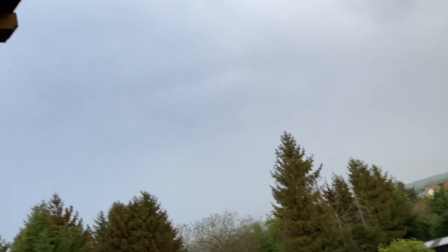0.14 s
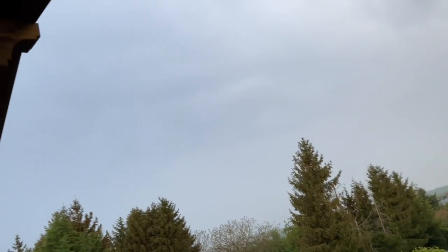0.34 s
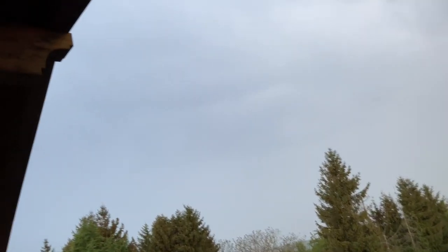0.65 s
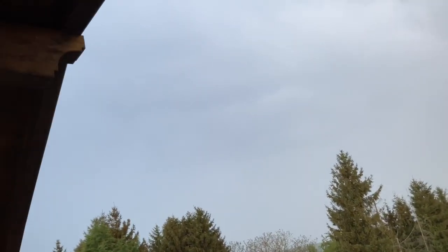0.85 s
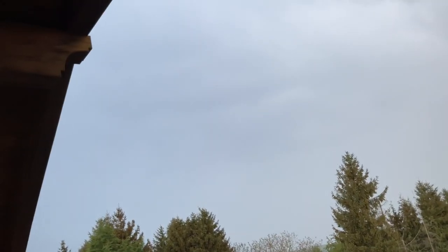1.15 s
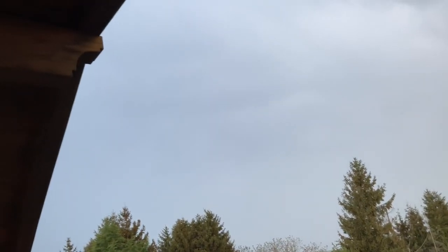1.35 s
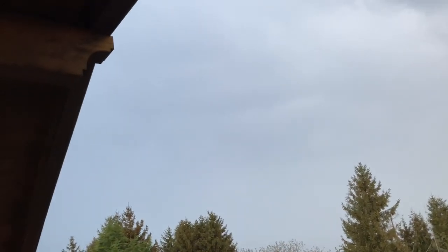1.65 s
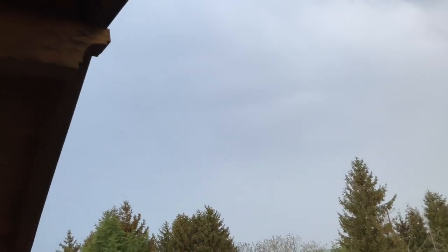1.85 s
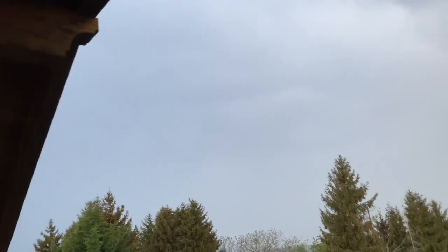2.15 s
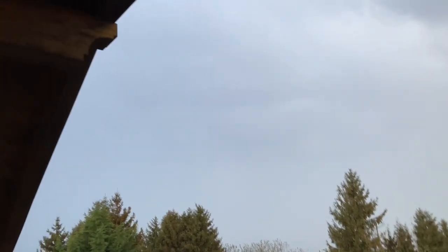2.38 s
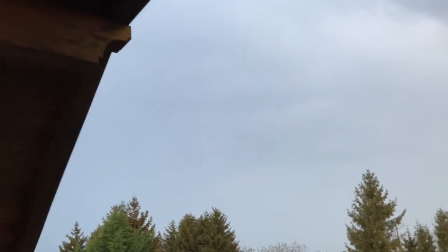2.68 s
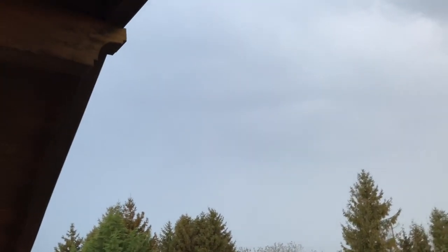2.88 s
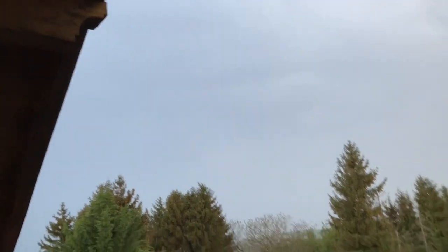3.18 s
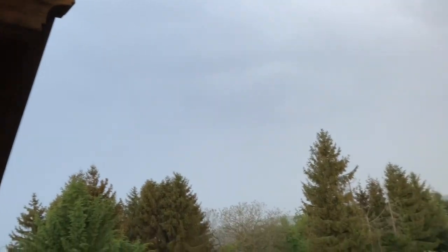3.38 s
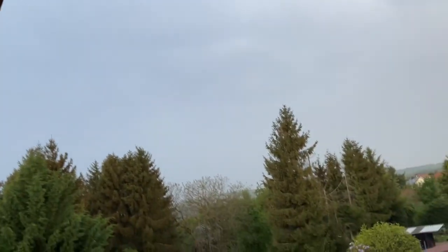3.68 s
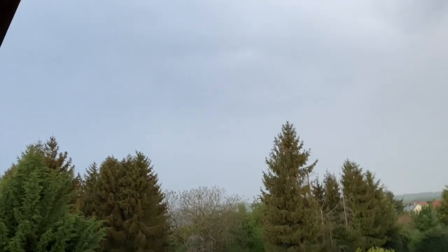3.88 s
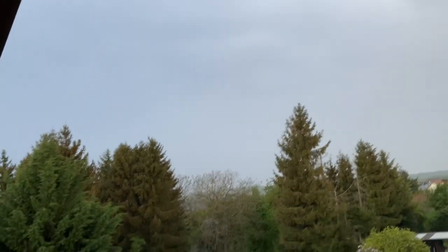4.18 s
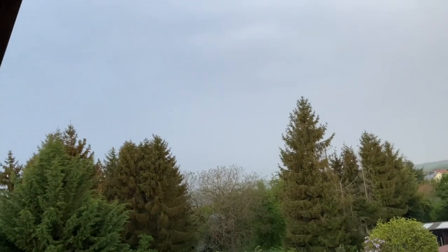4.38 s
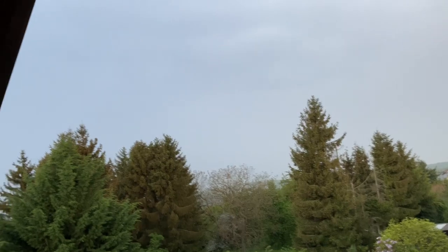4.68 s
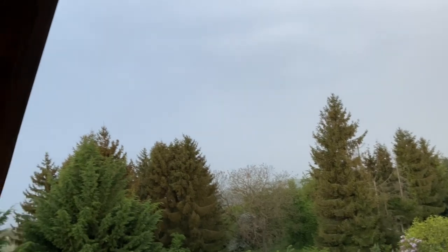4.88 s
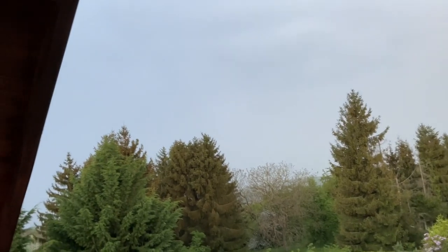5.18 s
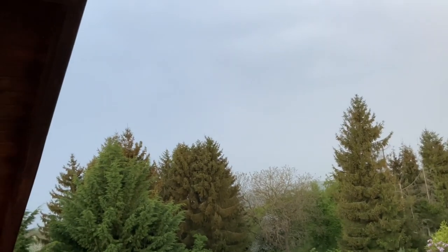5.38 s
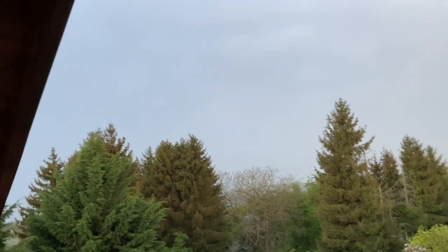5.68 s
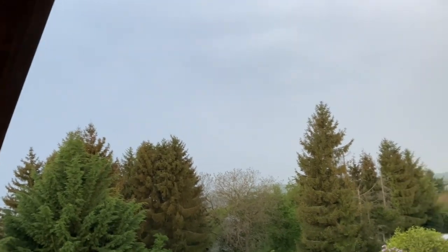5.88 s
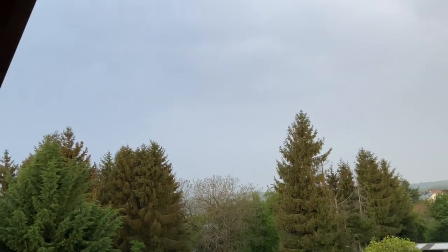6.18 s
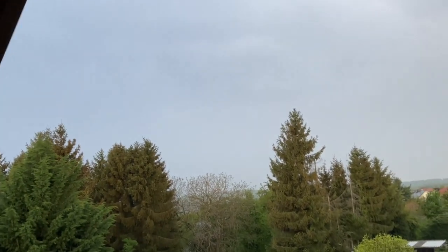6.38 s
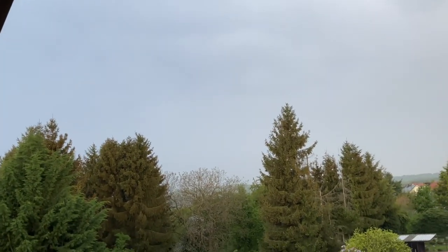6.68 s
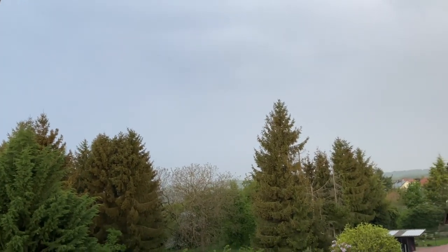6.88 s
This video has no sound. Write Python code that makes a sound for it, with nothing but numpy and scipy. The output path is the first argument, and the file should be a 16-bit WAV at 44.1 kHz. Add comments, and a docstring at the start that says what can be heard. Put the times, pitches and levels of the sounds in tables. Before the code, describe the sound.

Close, dry taps and bassy bumps hit the microphone at uneven intervals, mixed with short grainy scuffs and a few hard ticks. Behind them lie faint, fluctuating fine rain and a quiet garden ambience, with faint bird whistles early. The strongest cluster of thumps comes from about 3.9 to 4.5 seconds; afterwards hits are sparser, the murmur is fuller, and one loud snap comes just after six seconds.

```python
"""Rain drops and light touches land close and hard at a hand-held microphone under the eaves of a house:
a thump of air and a short spatter each, with longer scuffs swelling between them and a few sharp ticks.
Behind them a far bird whistles over fine rain hiss and a low outdoor murmur with passing noise bands.
Pushes are pressure pulses; spatter, scuffs, rain and murmur are shaped noise; the bird is gliding sines.
The recorder's bass filters smear every push into a falling chirp."""
import sys
import numpy as np
from scipy import signal
from scipy.fft import rfft, irfft, next_fast_len
from scipy.io import wavfile
from scipy.ndimage import uniform_filter1d, map_coordinates

SR = 44100
rng = np.random.default_rng(int(sys.argv[2]) if len(sys.argv) > 2 else 0)


def waveform_to_disk(signal):
    """Save audio, clipped to [-1, 1], as 16-bit WAV at the path in sys.argv[1]."""
    frames = np.transpose(np.atleast_2d(signal))
    scaled = np.clip(frames, -1, 1) * 32767
    samples = np.round(scaled).astype(np.int16)
    wavfile.write(sys.argv[1], SR, samples)


N = 310494
TIME = np.arange(N) / SR

# drops and taps: (time [s], push before the leak [full scale, signed], push width [ms],
# spatter length [ms], fizz level [dB], body level [dB])
DROPS = [(0.6689, -0.28, 0.51, 10, -41, -44.5), (1.033, -0.048, 0.52, 16, -46, -51),
         (1.1928, -0.12, 0.38, 7.8, -39, -41), (1.451, -0.003, 0.76, 63, -56.5, -57.5),
         (1.5565, -0.002, 0.4, 15, -54.5, -63), (2.1025, -0.18, 0.49, 6.2, -31.5, -32),
         (2.221, -0.003, 0.59, 29, -60, -58.5), (2.434, -0.004, 0.78, 27.6, -52, -53.5),
         (2.71, -0.008, 1.65, 6.7, -47, -46), (2.845, -0.004, 0.82, 7, -51, -50),
         (2.8686, -0.022, 1.16, 13, -51, -49.5), (3.0775, -0.15, 0.083, 6, -36.5, -32.5),
         (3.2233, -0.12, 0.76, 13.7, -18, -20.5), (3.3861, -0.25, 1, 16.3, -32.5, -27.5),
         (3.5514, 0.066, 0.72, 40, -47, -49), (3.571, 0.09, 1.26, 26, -36, -35),
         (3.657, 0.02, 1, 6.9, -75.5, -55), (3.8712, 0.46, 0.88, 9.5, -85.5, -57.5),
         (4.0079, -0.071, 0.51, 1.5, -62, -42), (4.131, -0.4, 0.55, 3.9, -53, -30),
         (4.2794, 0.58, 0.65, 3.9, -49, -23.5), (4.35, 0.11, 1.8, 16, -88, -53),
         (4.405, 0.41, 2.34, 6.2, -86, -47.5), (4.4575, 0.69, 1.88, 16.7, -64, -38.5),
         (4.7985, 0.055, 0.41, 0.78, -74, -38), (4.8195, -0.16, 0.64, 42, -68, -44.5),
         (4.893, 0.12, 0.77, 23.6, -32.5, -42.5), (5.183, -0.004, 0.35, 11, -50.5, -50.5),
         (5.646, 0.003, 0.6, 190, -55.5, -50), (5.819, 0.24, 1.3, 3.6, -62, -39),
         (5.9852, 0.11, 0.72, 35, -69, -40.5), (6.0464, -0.074, 0.46, 41, -44, -44)]
# colour of the bright fizz, in spatter and rain alike: (frequency [Hz], relative level [dB per Hz])
FIZZ_COLOUR = [(2000, -16.5), (3500, -16), (8300, -8), (10700, -4.5), (12800, -8.5), (16500, -20.5)]


def amp(db):
    """Decibels to linear gain."""
    return 10 ** (np.asarray(db) / 20)


def unit(x):
    """x scaled to an rms of 1."""
    return x / np.sqrt(np.mean(x ** 2))


def filtered(x, response):
    """x shaped by a complex response of frequency."""
    size = next_fast_len(N + SR // 2)
    hz = np.fft.rfftfreq(size, 1 / SR) + 1e-6  # keeps 0 Hz out of logs and divisions
    return irfft(rfft(x, size) * response(hz), size)[:N]


def wobble(rate):
    """A smooth random curve with rate knots a second."""
    knots = rng.standard_normal(int(N * rate / SR) + 4)
    return map_coordinates(knots, [TIME * rate])


def rush(colour, grain_db, rate):
    """Coloured noise of rms 1 whose grain is a level flicker with rate knots a second."""
    hz, db = np.transpose(colour)
    grainy = rng.standard_normal(N) * amp(grain_db * wobble(rate))

    def colouring(f):
        return amp(np.interp(np.log(f), np.log(hz), db, -120, -120))

    return unit(filtered(grainy, colouring))


def treble(colour, grain_db, rate):
    """Noise that crossfades, at equal power, to a lower copy of its colour while the treble is dull."""
    # how far the treble has sunk: (time [s], share of the lower copy's power [0-1])
    dullness = [(0.8, 0), (1.1, 0.23), (2.8, 0.42), (3.3, 0.65), (3.55, 1), (3.9, 0.07)]
    dull_pitch = 0.77  # frequency ratio of the lower copy
    dull = np.clip(np.interp(TIME, *np.transpose(dullness)), 0, 1)
    lower = rush(np.multiply(colour, [dull_pitch, 1]), grain_db, rate)
    return np.sqrt(1 - dull) * rush(colour, grain_db, rate) + np.sqrt(dull) * lower


def streaky(x, depth_db):
    """x with patches of random gain, about 130 Hz wide and 0.4 s long, at rms 1."""
    spectrum = signal.stft(x, nperseg=1024)[2]
    patches = uniform_filter1d(rng.standard_normal(spectrum.shape), size=3, axis=0)  # along frequency
    patches = uniform_filter1d(patches, size=35, axis=1)  # along time
    streaked = spectrum * amp(depth_db * unit(patches))
    return unit(signal.istft(streaked, nperseg=1024)[1][:N])


def background():
    """Hiss of fine rain, the murmur of the neighbourhood and a low, lumpy rumble, all as shaped noise."""
    # rain hiss: (time [s], level [dB])
    hiss_levels = [(0, -68.5), (0.12, -58), (0.74, -56), (0.8, -67.5), (1.0, -66.5), (1.09, -52.5),
                   (1.4, -65), (1.78, -72.5), (1.88, -55), (2.08, -53), (2.2, -78.5), (2.8, -65.5),
                   (2.89, -50), (3.25, -62.5), (3.36, -52.5), (3.5, -53.5), (3.7, -87), (4.75, -86.5),
                   (4.86, -54.5), (5.12, -58), (5.3, -67.5), (5.75, -59), (5.86, -82), (5.97, -73),
                   (6.1, -66), (6.45, -61.5), (7.03, -54)]
    # the lower bed, before its slow wander: (time [s], murmur level [dB], rumble level [dB])
    low_levels = [(0, -70.5, -67.5), (0.448, -57, -59), (0.8, -68.5, -68), (2.001, -69, -70),
                  (2.8, -70, -66.5), (3.45, -62.5, -62.5), (3.752, -72, -59), (4.06, -65.5, -52.5),
                  (4.26, -55.5, -53.5), (4.4, -65.5, -52), (4.751, -63, -61.5), (5.55, -51.5, -56),
                  (5.902, -53.5, -51.5), (6.2, -58, -60), (6.55, -57, -55), (7.03, -56, -50)]
    # colours of the two low layers: (frequency [Hz], relative level [dB per Hz])
    murmur_colour = [(300, -5.5), (700, -4.5), (1300, -2), (2200, -8.5), (3300, -15), (9000, -26)]
    rumble_colour = [(40, -19.5), (90, 0.5), (170, -2.5), (255, -3), (600, -12.5), (2000, -62.5)]

    hiss_db = np.interp(TIME, *np.transpose(hiss_levels))
    s, murmur_points, rumble_points = np.transpose(low_levels)
    murmur_db = np.interp(TIME, s, murmur_points) + 0.6 * wobble(6.6)
    rumble_db = np.interp(TIME, s, rumble_points)

    rain = streaky(treble(FIZZ_COLOUR, grain_db=0.9, rate=170), depth_db=1.8)
    murmur = streaky(rush(murmur_colour, grain_db=2.0, rate=31), depth_db=2.8)
    rumble = rush(rumble_colour, grain_db=2.2, rate=25)
    return amp(hiss_db) * rain + amp(murmur_db) * murmur + amp(rumble_db) * rumble


def spatters():
    """Bursts of grainy noise that break off short: a drop's jumps up and sags, a scuff's swells first."""
    # scuffs: (start [s], length [ms], fizz level [dB], body level [dB], thud level [dB])
    scuff_rows = [(0.066, 11.4, -49, -51, -45), (0.186, 70, -43, -62, -72), (0.235, 35.3, -41, -54, -52),
                  (0.437, 82, -50.5, -60, -67), (0.549, 77, -68, -75, -50.5), (0.671, 43, -42, -52, -52),
                  (0.845, 8.9, -41.5, -48, -59), (0.901, 77.5, -46.5, -49.5, -53),
                  (1.036, 31.6, -68, -52, -53.5), (1.194, 60, -57.5, -54, -56),
                  (1.575, 71, -90, -66, -57.5), (2.108, 38.4, -53, -48.5, -57),
                  (2.349, 31, -64.5, -64, -77), (3.285, 60, -79, -68.5, -57.5), (3.487, 38, -48, -81, -85),
                  (3.8, 110, -102, -77, -50.5), (4.141, 92, -57, -39.5, -40.5),
                  (4.293, 40, -71.5, -50.5, -50), (5.222, 40, -65, -53.5, -72),
                  (5.305, 58, -78, -77, -51.5), (5.413, 41, -60.5, -56.5, -50.5),
                  (5.448, 99, -54, -48.5, -65), (5.798, 30, -75, -55, -38), (6.049, 72.5, -43, -50.5, -71)]
    # colours of the two lower layers: (frequency [Hz], relative level [dB per Hz])
    body_colour = [(60, -19), (200, -5.5), (1000, -4.5), (3000, -12.5), (7000, -21), (16000, -82)]
    thud_colour = [(120, -13), (330, 1.5), (700, -5.5), (1800, -26.5)]
    lead_widths, attack_ms = 1.2, 1.4  # a drop's spatter starts this many push widths early; its rise
    swell_share, scuff_start_db, scuff_end_db = 0.55, -7, -3.5  # part of a scuff spent swelling; its ends
    release_ms, release_share = 7.5, 0.088  # how fast a burst breaks off, plus a part of its length

    bursts = []
    for s, _, width_ms, length_ms, fizz_db, body_db in DROPS:
        start = s - lead_widths * width_ms / 1000
        bursts.append((start, attack_ms, length_ms, -1.5, -12, [fizz_db, body_db, -120]))
    for s, length_ms, *layer_db in scuff_rows:
        bursts.append((s, swell_share * length_ms, length_ms, scuff_start_db, scuff_end_db, layer_db))

    levels = np.zeros((3, N))  # fizz, body, thud
    for s, rise_ms, length_ms, start_db, end_db, layer_db in bursts:
        ms = np.arange(round(length_ms * SR / 1000) + 1600) * 1000 / SR
        top = np.clip(rise_ms, .3, length_ms - .5)
        gone = length_ms * (1 + release_share) + release_ms
        shape_db = np.interp(ms, [0, top, length_ms, gone], [start_db, 4, end_db, -32.5], right=-120)
        levels[:, round(s * SR):][:, :len(ms)] += amp(layer_db)[:, None] * amp(shape_db)

    fizz = treble(FIZZ_COLOUR, grain_db=2.5, rate=1500)
    body = rush(body_colour, grain_db=2.5, rate=250)
    thud = rush(thud_colour, grain_db=5.0, rate=110)
    return np.sum(levels * [fizz, body, thud], axis=0)


def pushes():
    """A short pulse of pressure, inward or outward; the port leaks, so part of it swings back."""
    # further pressure pulses, some within scuffs or just after a knock:
    # (time [s], push before the leak [full scale, signed], push width [ms])
    extra_pulses = [(0.074, 0.072, 4.8), (0.239, 0.052, 0.82), (0.853, 0.089, 7), (3.688, 0.022, 1.23),
                    (3.7758, -0.032, 1.9), (3.99, -0.055, 1.2), (4.0218, 0.067, 2), (4.087, 0.043, 3.1),
                    (4.192, -0.14, 1.7), (4.3253, 0.13, 2.1), (4.4627, -0.22, 3.4)]
    leak_ms = 1.0  # time constant
    out = np.zeros(N)
    ms = np.arange(-800, 800) * 1000 / SR
    leak = np.exp(-np.arange(len(ms)) * 1000 / SR / leak_ms)
    for s, peak, width_ms in [row[:3] for row in DROPS] + extra_pulses:
        pulse = 4. ** (.15 - np.hypot(ms / width_ms, .15))  # pointed, with a rounded tip
        swing = np.convolve(pulse, leak / leak.sum())[:len(ms)]
        share = .8 if peak < 0 else .3  # negative pushes swing back further
        out[round(s * SR) - 800:][:len(ms)] += peak * (pulse - share * swing)
    return out


def bird():
    """Gliding, warbled whistles, blurred by the echoes of distant trees."""
    # far notes: (start [s], length [s], first pitch [Hz], last pitch [Hz], level before the warble [dB])
    notes = [(.79, .13, 2150, 2000, -66), (1.0, .29, 2310, 2370, -63.5), (1.24, .08, 4700, 4620, -64),
             (1.31, .16, 3780, 3920, -69), (1.47, .1, 4330, 4370, -70), (1.72, .36, 1450, 1410, -70),
             (2.22, .09, 2380, 2310, -63), (2.3, .14, 2200, 1760, -66), (2.58, .09, 2850, 2720, -74),
             (2.5, .11, 5750, 5950, -73), (2.635, .05, 6460, 6500, -70), (2.68, .12, 7740, 7830, -68),
             (2.88, .15, 3400, 3280, -67)]
    song = np.zeros(N)
    waver = 26 * wobble(45)  # random pitch wander in Hz
    for s, length, first_hz, last_hz, db in notes:
        u = np.linspace(0, 1, round(length * SR))
        pitch = first_hz + (last_hz - first_hz) * u + waver[round(s * SR):][:len(u)]
        phase = 2 * np.pi * np.cumsum(pitch) / SR
        swell = np.sin(np.pi * u) ** 0.19  # rounds the ends of a nearly flat note
        song[round(s * SR):][:len(u)] += amp(db) * swell * np.sin(phase)
    song = song * unit(.9 + wobble(200))  # warble in level
    t = np.arange(SR // 2) / SR
    echoes = rng.standard_normal(len(t)) * amp(-60 * t / .25)  # 60 dB down in 0.25 s
    blurred = signal.fftconvolve(song, echoes / np.linalg.norm(echoes))[:N]
    return song + amp(-1) * blurred


def noise_bands():
    """Narrow and wider bands of noise with linear fades: low drones, a far bird chorus and a hiss band."""
    # bands, the low ones perhaps a far car: (start [s], end [s], centre [Hz], width at half amplitude [Hz],
    # level before the fades [dB])
    bands = [(0.88, 2.69, 4350, 2000, -72), (4.76, 6, 1205, 110, -67.5), (6.2, 7.21, 252, 25, -61),
             (6.25, 7.21, 906, 490, -55.5), (6.4, 6.8, 10900, 470, -61)]
    fade_s = 0.26
    out = np.zeros(N)
    for start, end, hz, width_hz, db in bands:
        band = filtered(rng.standard_normal(N), lambda f: 1 / (1 + ((f - hz) / width_hz * 2) ** 2))
        fade = np.clip(np.minimum(TIME - start, end - TIME) / fade_s, 0, 1)
        out += amp(db) * unit(band) * fade
    return out


def ticks():
    """A snap of a few tenths of a millisecond that rings the port's two resonances."""
    # single sharp ticks: (time [s], approximate peak level [dB])
    snaps = [(0.9504, -27), (3.5714, -7), (4.8403, -23), (6.0462, -1)]
    out = np.zeros(N)
    t = np.arange(-10, 200) / SR
    rings = np.cos(2 * np.pi * 5000 * t) + 0.94 * np.cos(2 * np.pi * 10300 * t)
    envelope = amp(-60 * np.where(t < 0, -2 * t, t) / .001)  # falls 60 dB a ms, rises twice as steeply
    snap = rings * envelope / 2
    for s, db in snaps:
        out[round(s * SR):][:len(t)] -= amp(db) * snap
    return out


def scene():
    """All layers summed to one channel."""
    return (background() + spatters() + pushes() + bird() + noise_bands() + ticks())[None]


def record(dry):
    """Bass cut, all-pass stages that let the bass arrive late, self-noise and the band limit."""
    # corner of each pair of all-pass stages: (frequency [Hz])
    smear_hz = [55, 77, 108, 151, 211]
    self_noise_db, cut_hz, top_hz = -81, 62, 16700  # the noise level is set ahead of the filters

    def response(f):
        late = np.prod([((1j * f - c) / (1j * f + c)) ** 2 for c in smear_hz], axis=0)
        cut = 1 / np.sqrt(1 + (cut_hz / f) ** 11)
        fade = amp(np.interp(f, [15600, 15900, top_hz], [0, -24, -34])) * (f < top_hz)
        return late * cut * fade

    self_noise = unit(np.diff(rng.standard_normal(N + 9), 9))  # differencing tilts it to the high treble
    return filtered(dry[0] + amp(self_noise_db) * self_noise, response)[None]


dry = scene()
out = record(dry)
waveform_to_disk(out)
```